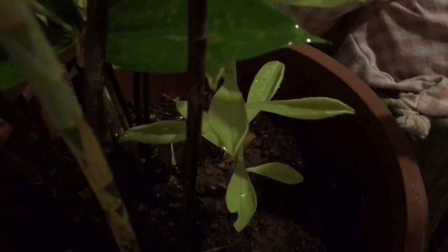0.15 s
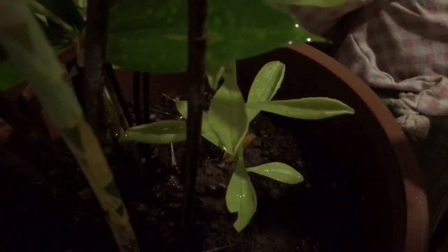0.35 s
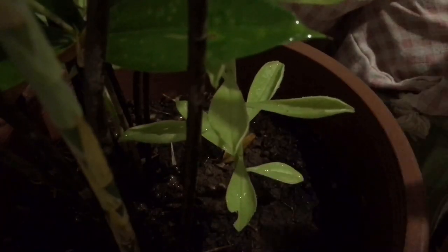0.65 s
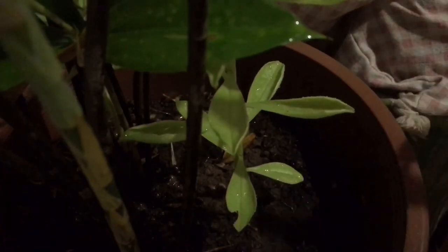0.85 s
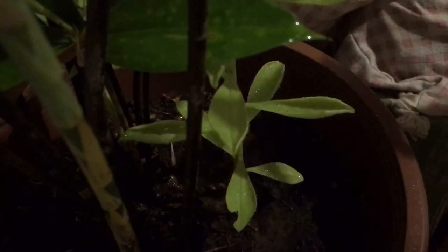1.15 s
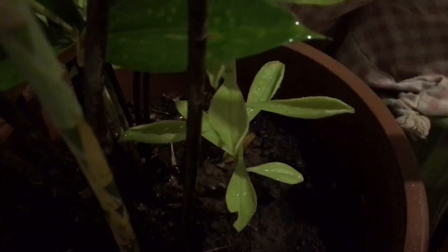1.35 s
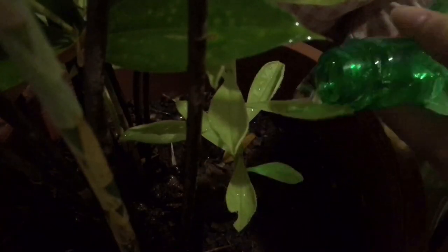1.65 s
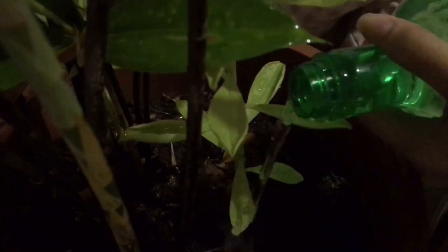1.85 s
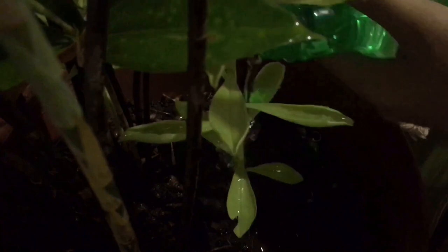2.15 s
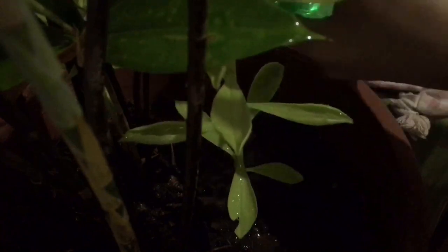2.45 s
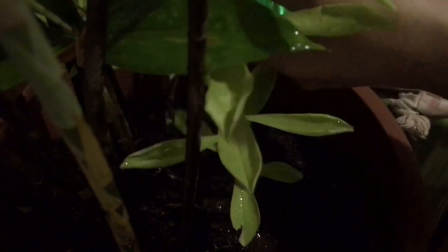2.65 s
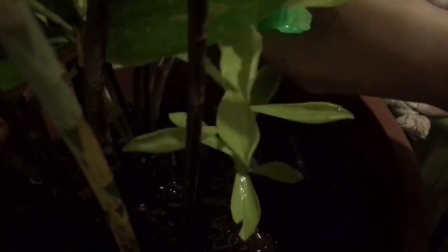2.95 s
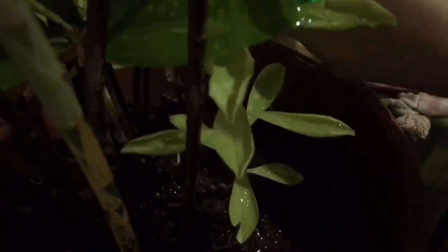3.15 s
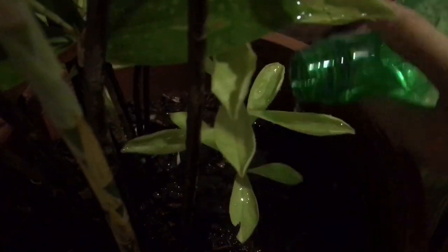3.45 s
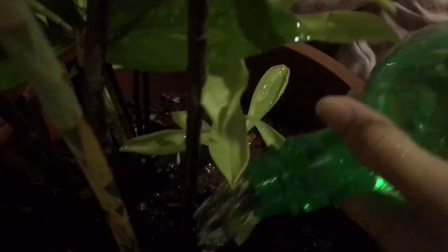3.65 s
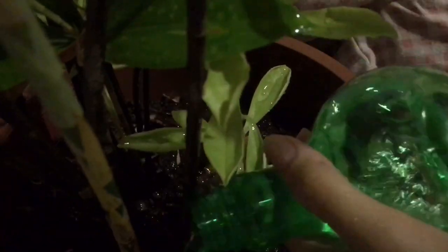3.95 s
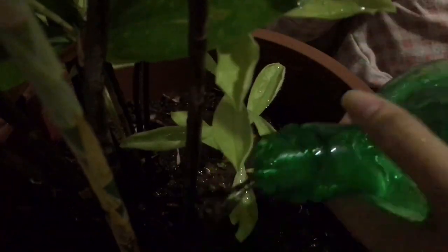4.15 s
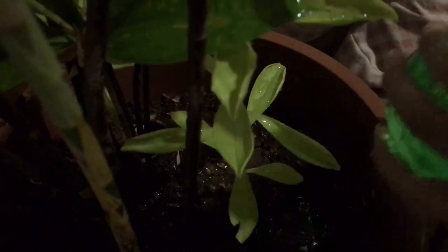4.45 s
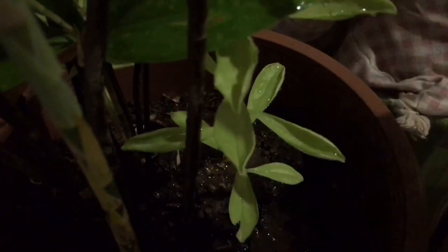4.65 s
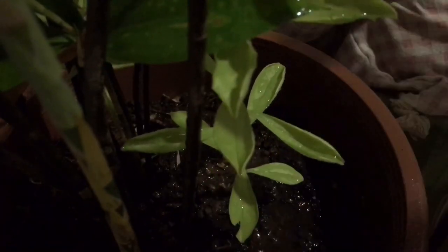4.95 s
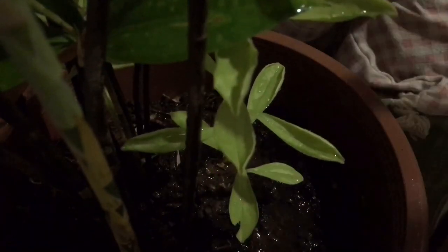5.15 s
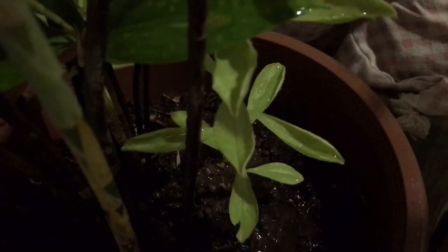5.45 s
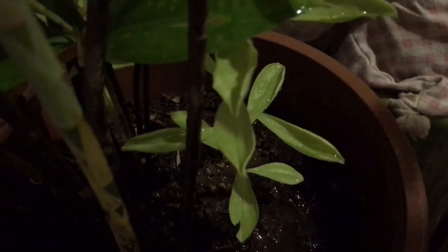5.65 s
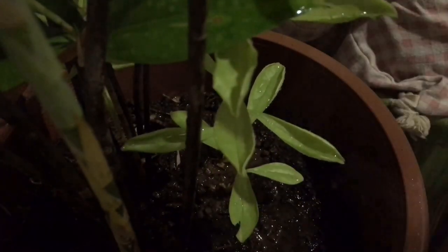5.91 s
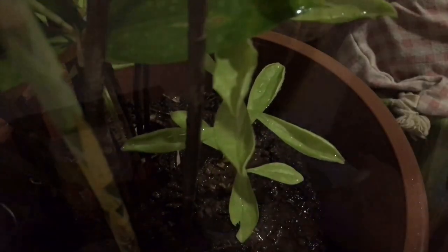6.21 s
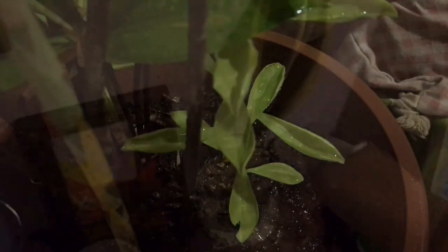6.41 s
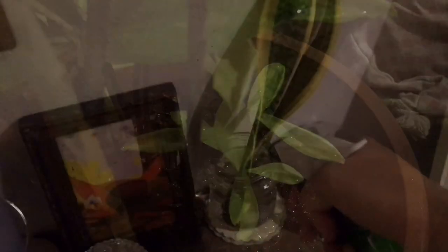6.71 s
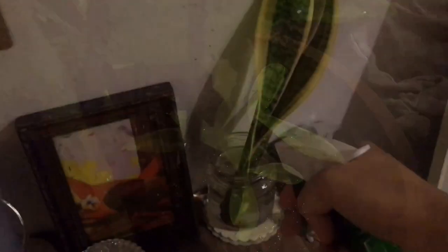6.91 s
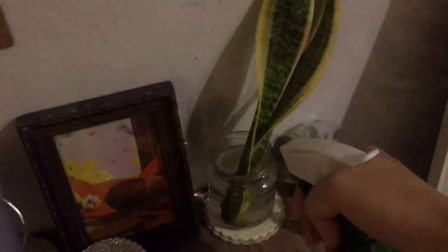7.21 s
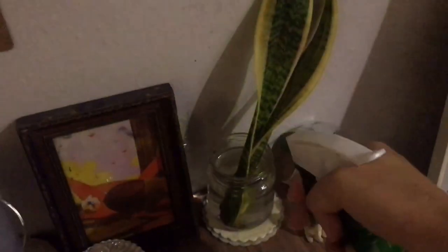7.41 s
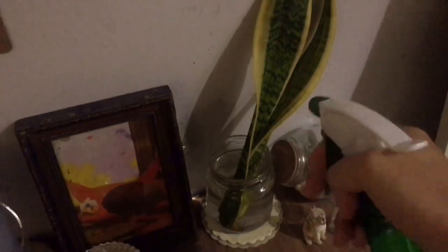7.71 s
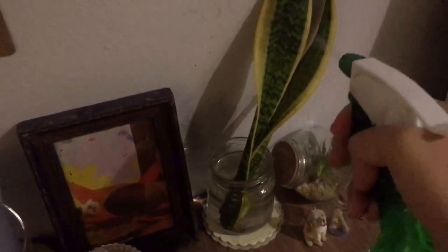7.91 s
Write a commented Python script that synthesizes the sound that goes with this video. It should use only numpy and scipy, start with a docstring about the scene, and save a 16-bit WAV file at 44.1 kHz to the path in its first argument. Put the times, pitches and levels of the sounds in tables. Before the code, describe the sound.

Handling rumble and gritty cap turning end in sharp plastic cracks. Small pours of water follow, dripping and ticking on a potted plant while leaves brush the hand. Thin plastic snaps back with booming, ringing pops. Five trigger pulls finish, each clicking, thumping and hissing fine mist. The microphone is close, with short indoor reflections and steady low hum.

```python
"""Houseplants are watered from a thin plastic spray bottle in a small room with a low hum.
First the collar grinds, squeaks and clicks free: grit and stick-slip rub, with cracks that ring the shell.
Water follows as ringing drops and a patter of grains, with knocks; then dents snap out and the hollow rings.
Last come five pump strokes: trigger clicks, piston thumps, noise for the mist and grains for its spatter.
Handling rumbles and leaf brushes lie between; still air and hum run throughout."""
import sys
import numpy as np
from scipy import signal
from scipy.fft import rfft, irfft
from scipy.io import wavfile

SR = 44100
rng = np.random.default_rng(int(sys.argv[2]) if len(sys.argv) > 2 else 0)


def wav_out(sig):
    """Save sig, one row per channel (or a flat mono array), as 16-bit PCM at SR to the path in sys.argv[1]."""
    wavfile.write(sys.argv[1], SR, np.round(np.clip(np.atleast_2d(sig).T, -1, 1) * 32767).astype(np.int16))


N = 355879

# strokes of the pump: (pull [s], length [s], crest [share of length], piston [dB], nozzle hiss [dB],
# spatter [dB], gurgle [dB]), levels before the balance of the mix
PUMP_STROKES = [(6.276, 0.082, 0.58, -37, -35, -42.5, -68), (6.676, 0.2, 0.11, -23, -42.5, -48.5, -49),
                (7.054, 0.23, 0.27, -19, -45.5, -48, -53), (7.513, 0.19, 0.61, -23.5, -49, -47, -63),
                (7.894, 0.21, 0.46, -21, -44.5, -36, -59)]
# ringing ticks of drops, bottle knocks and wall crackles: (time [s], relative level [dB], ring [Hz])
TICKS = [(1.8906, -28, 9000), (1.9294, -24.5, 9260), (2.0998, -30, 9700), (2.189, -30, 10500),
         (2.2144, -31, 5700), (2.2478, -21.5, 5870), (2.2604, -31, 8800), (2.3935, -33, 5900),
         (2.685, -32, 8700), (2.7064, -23.5, 3160), (2.881, -32, 5090), (2.918, -32.5, 3700),
         (2.938, -20, 6550), (3.0817, -22, 8050), (3.099, -25, 5500), (3.2052, -18.5, 5100),
         (3.2194, -25.5, 5930), (3.4702, -36.5, 11800), (3.828, -28.5, 7500), (3.957, -16.5, 4430),
         (3.9602, -10.5, 4380), (4.0109, -27.5, 11800), (4.067, -29.5, 8100), (4.31, -23, 4830),
         (4.3502, -26.5, 3050), (4.362, -26, 3760), (6.802, -19.5, 7100)]
# colour of a tick's splash or crack: (frequency [Hz], relative level [dB])
TICK_COLOUR = [(600, 0), (2000, -12), (5000, -7), (8500, -2), (16000, -4.5)]
# low thumps of cap, water and bottle: (time [s], relative level [dB], pitch [Hz])
LOW_THUMPS = [(1.014, -20, 301), (1.299, -25, 592), (1.303, -22.5, 695), (2.30, -22, 220),
              (2.437, -20, 232), (3.148, -21, 126), (3.856, -27.5, 430), (3.858, -33.5, 602),
              (3.862, -25.5, 295), (3.904, -25, 372), (3.937, -21.5, 123), (4.096, -15, 91),
              (4.1, -41, 1843), (4.485, -32, 430)]


def sprayer():
    """The trigger clicks, the piston thumps, the nozzle hisses and spits, droplets spatter on leaf and jar."""
    # trigger pulled and let go: (time [s], relative level [dB], ring [Hz], relative knock [dB])
    trigger_clicks = [(6.2746, -31.5, 3950, -13), (6.4081, -19, 2410, -13), (6.5134, -30, 2030, -33),
                      (6.5892, -30.5, 3770, -5.5), (6.6734, -16, 2470, -28), (6.9087, -27, 6100, -18),
                      (7.051, -14, 3570, -13), (7.3374, -25, 4630, -34), (7.5099, -16.5, 2480, -18),
                      (7.7573, -23.5, 2330, -28), (7.8907, -15.5, 2360, -29)]
    # colour of the trigger's crack: (frequency [Hz], relative level [dB])
    trigger_crack = [(600, -3.5), (1500, 1), (2400, 2), (5000, 1.5), (7000, -4.5), (10000, -6),
                     (16000, -13.5)]
    # colour of the mist at the nozzle: (frequency [Hz], relative level [dB])
    nozzle_colour = [(1500, -49), (4000, -4.5), (7000, 6), (9000, 5), (12500, 10.5), (16000, -2.5)]
    # colour of droplets landing: (frequency [Hz], relative level [dB])
    spatter_colour = [(250, -15), (600, -1.5), (1200, -2), (2400, 5.5), (3000, 1.5), (3600, 6.5), (5000, 0),
                      (8000, -2), (15000, -8.5)]
    piston_hz = 289

    jet, landing, air = pump_strokes()
    flutter = from_db(3.1 * drift(rate_hz=110))   # the jet is unsteady
    mist = colour(rng.standard_normal(N), nozzle_colour)
    hiss = from_db(-1) * jet * flutter * mist
    spatter = from_db(-1) * landing * colour(grains(2800, 2.9), spatter_colour)
    gurgle = air * pings(per_s=320, low_hz=1480, high_hz=3600, cycles=57, rise=0.051, range_db=2)
    spit = air * pings(per_s=290, low_hz=5300, high_hz=13000, cycles=34, rise=0.05, range_db=25)
    spat_drop = ringing_ticks(TICKS[26:])   # one fat drop spat from the nozzle

    clicks = plastic_clicks(trigger_clicks, trigger_crack, t60=0.04, ring_db=-8.5, knock_db=3, gain_db=-25.5)
    lever = from_db(5) * resonate(clicks, 1260, 87)
    piston_rows = [(s, db, piston_hz) for s, _, _, db, *_ in PUMP_STROKES]
    piston = thumps(piston_rows, t60=0.054, rise_s=0.0015)
    return hiss + spatter + gurgle + spit + spat_drop + clicks + lever + piston


def pump_strokes():
    """Each pull drives a jet; its droplets land a moment later, and air is sucked in behind the water."""
    flight_s, air_lag_s = 0.0051, 0.051   # delays after the pull
    spatter_crest, gurgle_crest = 0.43, 0.32   # share of the stroke
    jet, landing, air = np.zeros((3, N))
    for s, length_s, crest, _, hiss_db, spatter_db, gurgle_db in PUMP_STROKES:
        jet += arches([(s, length_s, hiss_db)], crest, steep=2.1)
        landing += arches([(s + flight_s, length_s, spatter_db)], spatter_crest, steep=1.5)
        air += arches([(s + air_lag_s, length_s, gurgle_db)], gurgle_crest, steep=1.15)
    return dribble(jet), dribble(landing), air


def dribble(flow):
    """A flow with the weak tail of pressure that leaks away after it."""
    leak_s, pressure_db = 0.056, -5.5
    keep = np.exp(-1 / (leak_s * SR))
    leaking = signal.lfilter([1 - keep], [1, -keep], flow + 1e-18)
    return flow + from_db(pressure_db) * leaking


def water():
    """Fat drops ring over a patter of fine ones; bubbles fizz in the wet soil; dull plops and bumps swing."""
    # gushes from the tipped bottle: (start [s], length [s], relative level [dB])
    gushes = [(1.87, 0.18, -50), (2.17, 0.27, -55), (2.66, 0.41, -53.5), (3.06, 0.09, -45.5),
              (3.18, .24, -59), (3.81, 0.15, -44), (3.96, .16, -54), (4.19, 0.2, -47)]
    # fine dripping beneath and between the gushes: (start [s], length [s], relative level [dB])
    dripping = [(1.8, 3.0, -66.5)]
    flow_crest = 0.67   # share of its length at which a flow is strongest

    drops = ringing_ticks([*TICKS[:19], *TICKS[21:23]])   # fat drops on leaves and soil
    fizz = pings(per_s=230, low_hz=2500, high_hz=11000, cycles=24, rise=0.05, range_db=26)
    ticks = colour(grains(260, 5), TICK_COLOUR)
    flow = arches(gushes, flow_crest, steep=0.7) + arches(dripping, flow_crest, steep=0.26)
    patter = flow * (0.51 * fizz + 0.5 * ticks)
    plops_and_bumps = thumps([*LOW_THUMPS[:1], *LOW_THUMPS[3:]], t60=0.051, rise_s=0.0027)
    return drops + patter + plops_and_bumps


def bottle_knocks():
    """The bottle knocks a pot or its squeezed wall crackles: short cracks that ring."""
    # bottle knocks and wall crackles: (time [s], relative level [dB], ring [Hz])
    knocks_and_crackles = [*TICKS[19:21], *TICKS[23:26]]
    return ringing_ticks(knocks_and_crackles)


def ringing_ticks(rows):
    """Each tick is a short burst of noise with a brief ring of two close modes."""
    out = np.zeros(N)
    for s, db, hz in rows:
        start = colour(burst(t60=0.013), TICK_COLOUR)
        ring = mode_pair(hz, cycles=42)
        add(out, s, from_db(db - 27.5) * rms_one(start + 1.7 * ring))
    return out


def bottle_wall():
    """Dents snap out; the big ones swing a whole panel and set the hollow ringing."""
    # whole panels of the wall popping out: (time [s], relative level [dB], pitch [Hz])
    panel_pops = [(5.1478, -1, 354.4), (5.3668, -8, 323), (5.8535, -4.5, 324), (5.982, -25.5, 316)]
    # wall snapping between dents: (time [s], relative level [dB], ring [Hz], relative knock [dB])
    wall_snaps = [(5.1237, -15.5, 3210, -17), (5.1352, -18.5, 3360, -7), (5.1447, -14.5, 2470, -17),
                  (5.1485, -12, 2400, -13), (5.1562, -20, 4950, -20), (5.2012, -7.5, 3020, -30),
                  (5.3632, -15, 3280, -2), (5.366, -17, 3600, -22), (5.3708, -3, 3420, -15),
                  (5.3924, -2, 3490, -28), (5.654, -40.5, 3500, 2.5), (5.685, -31.5, 3450, -3.5),
                  (5.8492, -25, 3520, -2.5), (5.853, -9, 3386, -2.5), (5.8585, -6, 3680, -11.5),
                  (5.984, -36, 5300, 2.5), (6.009, -34.5, 5200, 0), (6.130, -42, 3280, 6)]
    # colour of the wall's crack: (frequency [Hz], relative level [dB])
    wall_crack = [(600, -26.5), (1900, -20), (2600, -3), (3500, -3.5), (5000, -7), (7000, -14),
                  (9500, -22.5), (11000, -26), (16000, -26.5)]
    # resonances of the bottle's hollow: (frequency [Hz], width [Hz], relative level [dB])
    hollow_modes = [(266, 15.2, 17), (394.2, 10.3, 15.5), (479, 11.7, -8.5)]
    # overtones of the wall: (frequency [Hz], width [Hz], relative level [dB])
    wall_overtones = [(2470, 50, 1), (2900, 90, -8.5), (3320, 75, -4), (3480, 90, -7), (4520, 120, -1.5)]

    swing = thumps(panel_pops, t60=0.032, rise_s=0.0046) * from_db(2.5)
    snaps = plastic_clicks(wall_snaps, wall_crack, t60=0.038, ring_db=-0.5, knock_db=2.5, gain_db=-23.5)
    hollow = sum(from_db(db) * resonate(swing, hz, width) for hz, width, db in hollow_modes)
    overtones = sum(from_db(db) * resonate(snaps, hz, width) for hz, width, db in wall_overtones)
    return swing + hollow + snaps + from_db(4) * overtones


def spray_head():
    """The collar grinds along its thread in fits and starts, catches, squeaks and rings low as it snaps free."""
    # head ticking over its thread and coming off:
    # (time [s], relative level [dB], ring [Hz], relative knock [dB])
    cap_clicks = [(0.308, -22, 2570, -40), (0.426, -34, 2680, -24), (0.4472, -26.5, 2780, -14),
                  (0.5524, -29, 2320, -4), (0.5986, -24, 2540, -14), (0.6044, -28, 2450, -11),
                  (0.6164, -19, 2420, -13), (0.6592, -26, 3800, -12), (0.6644, -11, 2450, -17),
                  (0.707, -20.5, 3620, -15), (0.7278, -28.5, 2430, -8), (0.7906, -28.5, 3400, -8),
                  (0.872, -31, 2200, 0), (0.8953, -29, 2420, -1.5), (0.987, -28, 2620, -7),
                  (1.0012, -24, 2780, -7), (1.0107, -7.5, 2690, -13), (1.0152, -9, 4640, -13),
                  (1.069, -12.5, 2610, -14.5), (1.1833, -28, 3610, -6), (1.2855, -4.5, 3690, -18.5),
                  (1.2946, 1.5, 4470, -27.5)]
    # colour of the cap's crack: (frequency [Hz], relative level [dB])
    cap_crack = [(600, -28.5), (1500, -11), (2500, -6.5), (3600, 6), (4700, -4), (6000, -8), (9000, -15.5),
                 (16000, -18)]
    # turns of the collar on its thread: (start [s], length [s], relative rub level [dB])
    twists = [(0, 0.14, -56.5), (.355, .16, -50), (.53, 0.063, -48), (.635, .09, -42), (.73, 0.29, -58.5),
              (.995, 0.17, -49.5), (1.16, 0.19, -63.5)]
    # colour of the gritty thread: (frequency [Hz], relative level [dB])
    thread_colour = [(500, -16), (1000, 5), (1600, -6.5), (2500, 3.5), (4000, -1.5), (6000, -3),
                     (10000, -4.5), (16000, -13.5)]
    # seal squeaking as the head pulls out: (start [s], length [s], level [dB])
    seal_squeak = [(1.175, 0.138, -52)]
    twist_crest = 0.337   # share of its length at which a turn is strongest

    grit = colour(grains(1500, 4.2), thread_colour)
    catches = pings(per_s=300, low_hz=750, high_hz=5500, cycles=15, rise=0, range_db=24)
    stick_slip = from_db(3 * drift(rate_hz=40))
    rub = arches(twists, twist_crest, steep=0.74) * stick_slip * (0.91 * grit + 0.76 * catches)

    slips = grains(3000, 2)
    squeal = rms_one(resonate(slips, 3750, 300) + 0.7 * resonate(slips, 4700, 300))
    squeak = arches(seal_squeak, twist_crest, steep=0.593) * squeal
    clicks = plastic_clicks(cap_clicks, cap_crack, t60=0.027, ring_db=1.5, knock_db=8.5, gain_db=-26.5)
    low_ring = thumps(LOW_THUMPS[1:3], t60=0.051, rise_s=0.0027)   # the cap as it snaps free
    return rub + squeak + clicks + low_ring


def plastic_clicks(rows, spectrum, t60, ring_db, knock_db, gain_db):
    """Each snap is a short crack and a brief ring of the bent spot, over a duller knock of the shell."""
    out = np.zeros(N)
    for s, db, hz, body_db in rows:
        ring = from_db(ring_db) * mode_pair(hz, cycles=52)
        crack = rms_one(colour(burst(t60), spectrum) + ring)
        knock = from_db(body_db + knock_db) * shell(spread_db=9)
        add(out, s, from_db(db + gain_db) * (crack + knock))
    return out


def shell(spread_db):
    """Every blow strikes the shell's modes with strengths of its own; rms 1."""
    # modes of bottle and collar, before each blow's chance: (frequency [Hz], level [dB], t60 [s])
    shell_modes = [(328, -2.5, 0.085), (498, -9, 0.14), (588.5, -7, 0.1226), (705, -1, 0.05),
                   (841, -1.5, 0.065), (924, 4.5, 0.078), (1075, 3, 0.031), (1223, 6.5, 0.042),
                   (1428, -21.5, 0.067), (1635, -1, 0.11), (1883, -5, 0.025)]
    out = 0
    for hz, db, t60 in shell_modes:
        fade = dying(t60)
        strength = from_db(db + spread_db * rng.standard_normal()) * rng.choice([-1, 1])
        struck_hz = hz * (1 + 0.026 * rng.standard_normal())
        out = out + strength * fade * np.sin(2 * np.pi * struck_hz * np.arange(len(fade)) / SR)
    return rms_one(out)


def thumps(rows, t60, rise_s):
    """Heavily damped low swings with a softened onset."""
    out, fade = np.zeros(N), dying(t60)
    t = np.arange(len(fade)) / SR
    onset = 1 - np.exp(-t / rise_s)
    for s, db, hz in rows:
        add(out, s, from_db(db) * fade * onset * np.sin(2 * np.pi * hz * t))
    return out


def hand():
    """Fingers shift on the bottle with a hollow rumble; leaves brush past, catching and flicking free."""
    # fingers shifting their grip: (start [s], length [s], rumble level [dB])
    grips = [(0, 0.089, -47.5), (.17, .12, -41.5), (.76, 0.35, -44), (2.26, 0.32, -40), (3.05, .17, -42),
             (3.82, 0.41, -48)]
    # colour of the handling rumble: (frequency [Hz], relative level [dB])
    rumble_colour = [(80, -3), (150, -13), (240, 6.5), (380, -4.5), (600, -14), (1500, -38.5)]
    # leaves brushing past hand and bottle: (start [s], length [s], level [dB], centre [Hz])
    brushes = [(2.09, 0.23, -48.5, 1330), (2.574, 0.18, -52, 3930), (2.898, 0.22, -58.5, 2800),
               (3.075, 0.12, -49.5, 1570), (3.577, 0.11, -59.5, 2210), (3.849, 0.077, -44.5, 1980),
               (3.935, 0.3, -54, 2400), (4.479, 0.023, -47.5, 1820)]
    # colour of leaf friction: (frequency [Hz], relative level [dB])
    rustle_colour = [(250, -17), (600, 7.5), (1500, -11), (4000, -15), (8000, -8.5), (14000, -10)]

    out = arches(grips, crest=0.5, steep=0.71) * colour(rng.standard_normal(N), rumble_colour)
    flicks = pings(per_s=470, low_hz=830, high_hz=3650, cycles=41, rise=0, range_db=24)
    friction = colour(grains(1400, 2.5), rustle_colour) + from_db(-9) * flicks
    for s, length_s, db, hz in brushes:
        progress = np.linspace(0, 1, round(length_s * SR))
        stroke = np.sin(np.pi * np.sqrt(progress))   # quick start, slow release
        rustle = resonate(friction, hz, hz)[round(s * SR):][:len(stroke)]
        add(out, s, from_db(db) * stroke * rms_one(rustle))
    return out


def background():
    """Still room air and the wavering hum of an appliance."""
    # partials of the hum: (frequency [Hz], rms level before the swell [dB], waver [share])
    hum_partials = [(64.7, -51, .8), (102, -52.5, 0.38), (135.7, -56.5, 0.82), (230.5, -51.5, 0.34),
                    (685, -73.5, 0.55)]
    # nearness to the hum: (time [s], level [dB])
    hum_swell = [(0, 0), (6.3, -2.5), (8.07, 3)]
    # colour of the room air: (frequency [Hz], relative level [dB])
    air_colour = [(15, -28.5), (25, -27), (49, -12.5), (108, -7.5), (166, -14), (236, -10), (263, -8.5),
                  (301, -12), (575, -28.5), (677, -21), (818, -24.5), (962, -24.5), (1260, -31.5),
                  (2280, -34.5), (16000, -46.5)]

    t = np.arange(N) / SR
    hum = np.zeros(N)
    for hz, db, waver in hum_partials:
        # complex drift wavers both level and phase
        wander = 1 - waver + waver * (drift(rate_hz=4) + 1j * drift(rate_hz=1.2))
        hum += from_db(db) * rms_one(np.real(wander * np.exp(2j * np.pi * hz * t)))
    air = from_db(-47.5) * colour(rng.standard_normal(N), air_colour)
    return hum * level(hum_swell) + air


def room(x, wet_db, echo_s, echo_db, size=22050):
    """One near reflection, and a diffuse tail whose decay time depends on the band."""
    # decay of the room: (frequency [Hz], t60 [s])
    room_decay = [(200, 0.22), (700, 0.31), (3500, 0.19), (7000, 0.18), (14000, 0.3)]
    t, tail = np.arange(size) / SR, np.zeros(size)
    onset = 1 - np.exp(-t / 0.006)
    edges = np.geomspace(100, 16000, num=9)
    for low, high in zip(edges, edges[1:]):
        bandpass = signal.butter(2, [low, high], "band", fs=SR, output="sos")
        band = signal.sosfilt(bandpass, rng.standard_normal(size))
        t60 = at_hz(room_decay, np.sqrt(low * high))
        tail += band * from_db(-60 * t / t60) * onset
    tail = signal.lfilter(*signal.butter(1, 6000, fs=SR), tail)
    response = from_db(wet_db) * tail / np.sqrt(np.sum(tail ** 2))
    response[round(echo_s * SR)] += from_db(echo_db)
    return x + signal.fftconvolve(x, response)[:N]


def grains(per_s, spread_db):
    """Random tiny impacts of uneven size."""
    sizes = from_db(spread_db * np.minimum(rng.exponential(1, N), 3)) * rng.choice([-1, 1], N)
    return sizes * (rng.random(N) < per_s / SR)


def pings(per_s, low_hz, high_hz, cycles, rise, range_db):
    """Random tiny decaying tones of some cycles each, rising in pitch by rise as bubbles do; rms 1."""
    out = np.zeros(N)
    for when, size, strength in rng.random((round(per_s * N / SR), 3)):
        hz = low_hz * (high_hz / low_hz) ** size
        age = np.linspace(0, 1, round(cycles / hz * SR))
        fade = from_db(-range_db * strength - 60 * age)
        add(out, when * (N - 1) / SR, fade * np.sin(2 * np.pi * cycles * age * (1 + rise * age)))
    return rms_one(out)


def burst(t60, sharp=0.73, sharp_t60=0.0034):
    """Countless close modes struck at once: a sharp start, then an even rattle that dies."""
    fade = dying(t60) + sharp * dying(sharp_t60)
    return fade * rng.choice([-1, 1], len(fade))


def mode_pair(hz, cycles, split=0.04):
    """Two close modes, either side of hz, that beat and die within some cycles; rms 1."""
    fade = dying(cycles / hz)
    phase = 2 * np.pi * hz * np.arange(len(fade)) / SR
    return rms_one(fade * (np.sin(phase * (1 - split)) + np.sin(phase * (1 + split))))


def resonate(x, hz, width_hz):
    """One resonance with a gain of about 1 at its peak."""
    r = np.exp(-np.pi * width_hz / SR)
    zeros = np.array([1, 0, -1]) * (1 - r * r) / 2
    poles = [1, -2 * r * np.cos(2 * np.pi * hz / SR), r * r]
    return signal.lfilter(zeros, poles, x + 1e-18)


def colour(x, spectrum, size=4096):
    """Causal (minimum-phase) filter with the given spectrum; rms 1."""
    cepstrum = irfft(np.log(from_db(at_hz(spectrum, np.fft.rfftfreq(size, 1 / SR)))))
    # folding the cepstrum forward makes the response minimum-phase
    cepstrum[1:size // 2] *= 2
    cepstrum[size // 2 + 1:] = 0
    response = irfft(np.exp(rfft(cepstrum)))
    return rms_one(signal.fftconvolve(x, response)[:len(x)])


def arches(rows, crest, steep=1.2):
    """Gain of movements (start [s], length [s], level [dB]): each swells to its crest and falls to rest."""
    out = np.zeros(N)
    for s, length_s, db in rows:
        progress = np.linspace(0, 1, round(length_s * SR))
        phase = np.interp(progress, [0, np.clip(crest, 0.02, 0.98), 1], [0, np.pi / 2, np.pi])
        add(out, max(s, 0), from_db(db) * np.abs(np.sin(phase)) ** steep)
    return out


def drift(rate_hz):
    """Smooth chance with spread 1."""
    step = 40   # samples between the points of the slow curve
    r = np.exp(-2 * np.pi * step * rate_hz / SR)
    noise = rng.standard_normal(N // step + 2002)
    slow = signal.lfilter([1], [1, -2 * r, r * r], noise)[2000:]   # skip the filter's start-up
    return np.interp(np.arange(N) / step, np.arange(len(slow)), rms_one(slow))


def level(rows):
    """Gain curve from rows of (time [s], level [dB])."""
    s, db = np.transpose(rows)
    return from_db(np.interp(np.arange(N) / SR, s, db))


def dying(t60, size=6000):
    """Exponential decay, 60 dB in t60 seconds."""
    return from_db(-60 * np.arange(size) / SR / t60)


def add(out, s, sound):
    """Mix a sound in at time s."""
    i = round(s * SR)
    out[i:i + len(sound)] += sound[:N - i]


def at_hz(points, hz):
    """Read a table on a log-frequency axis."""
    f, value = np.transpose(points)
    return np.interp(np.log(hz + 1e-9), np.log(f), value)


def from_db(db):
    """Decibels to gain."""
    return 10 ** (np.asarray(db) / 20)


def rms_one(x):
    """Scale to rms 1."""
    return x / np.sqrt(np.mean(x ** 2) + 1e-20)


def scene():
    """Bottle, water and hand sound in the room; air and hum are added without its echo."""
    near = sprayer() + water() + bottle_knocks() + bottle_wall() + spray_head() + hand()
    return (room(near, wet_db=-15.5, echo_s=0.0087, echo_db=-20) + background())[None]


def record(dry):
    """The microphone port hollows the treble; peaks clip at full scale; the top is cut."""
    hollowed = dry - 0.31 * resonate(dry, 10400, 860)
    heard = np.clip(hollowed, -1, 1)
    cutoff_hz = 16100
    return signal.sosfilt(signal.ellip(10, 0.1, 70, cutoff_hz, fs=SR, output="sos"), heard)


dry = scene()
out = record(dry)
wav_out(out)
```